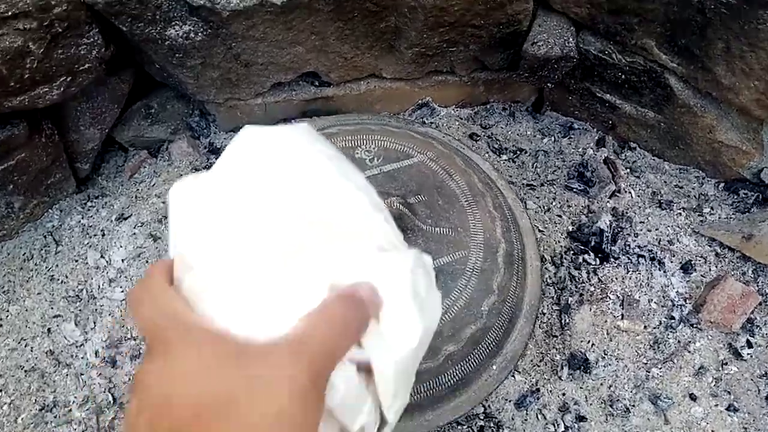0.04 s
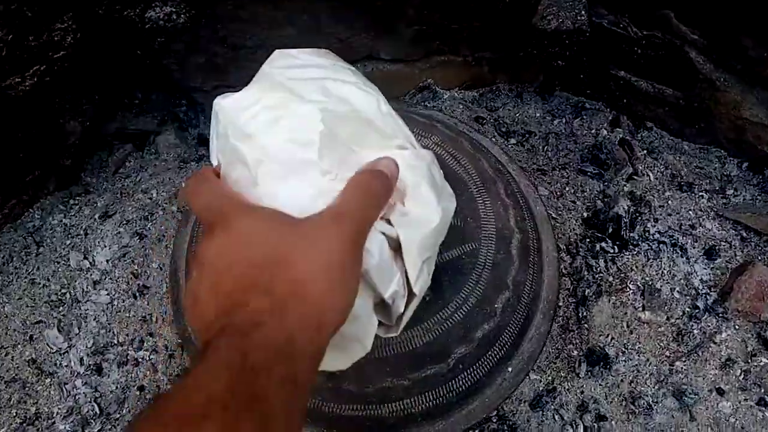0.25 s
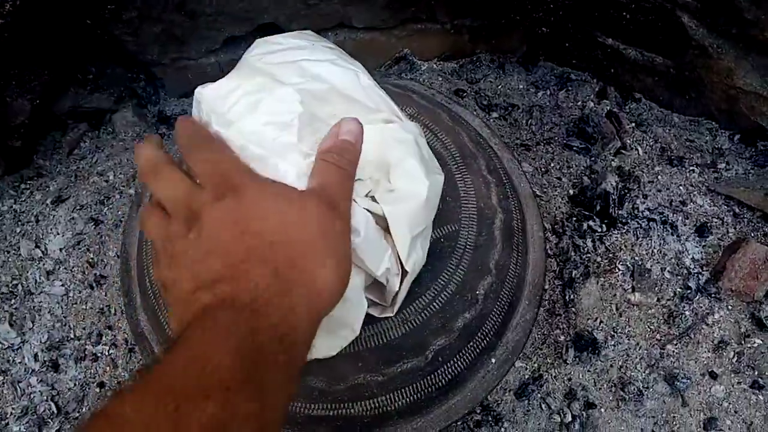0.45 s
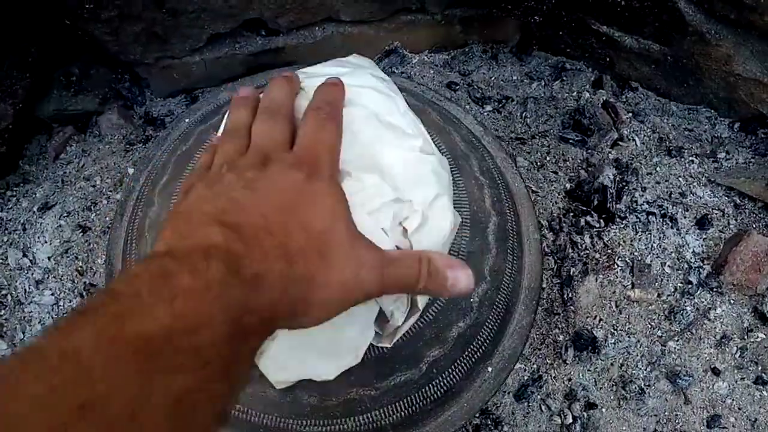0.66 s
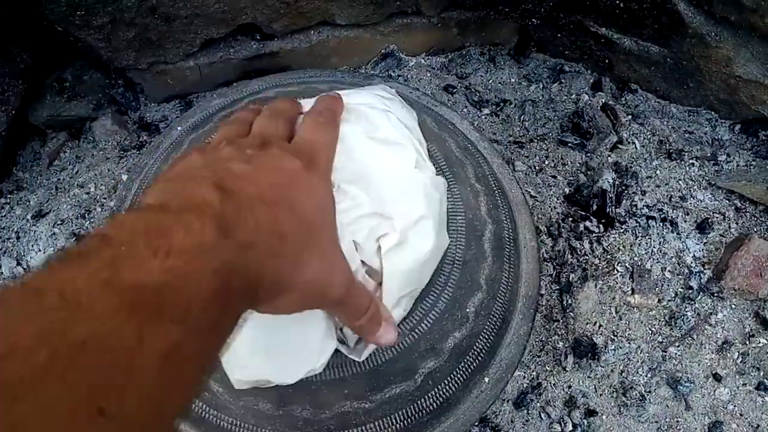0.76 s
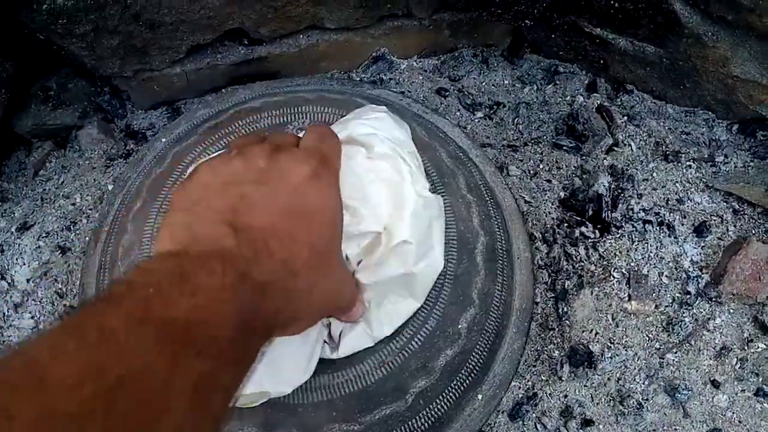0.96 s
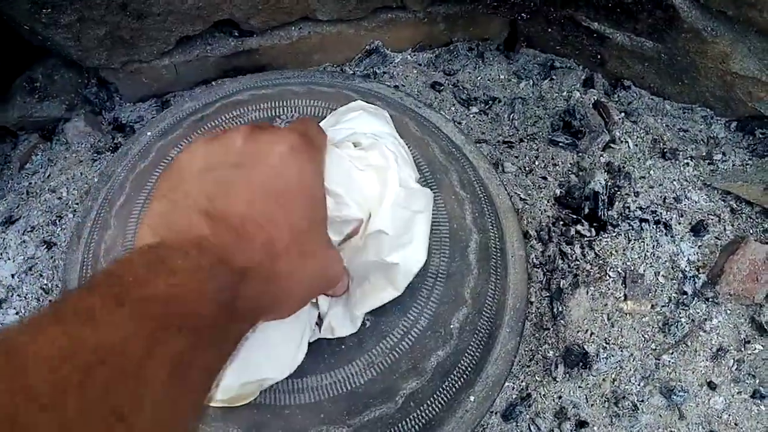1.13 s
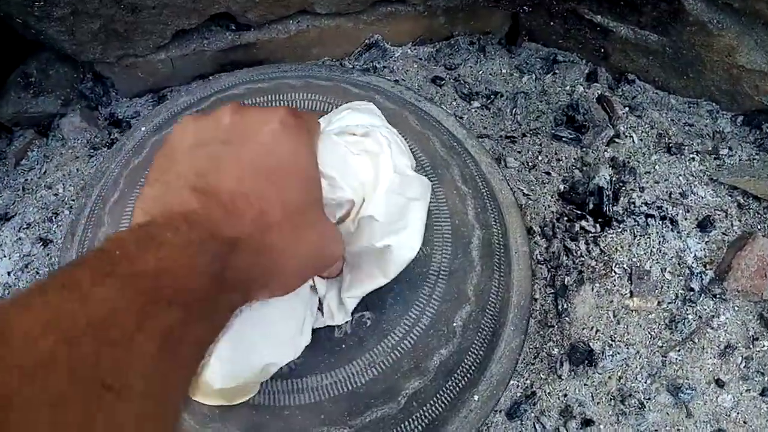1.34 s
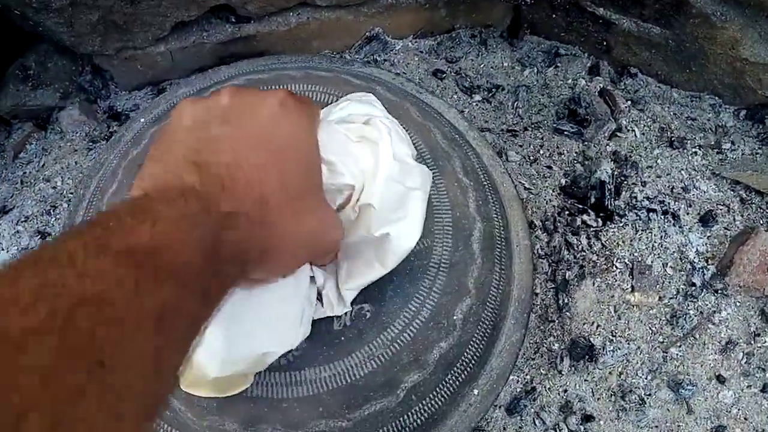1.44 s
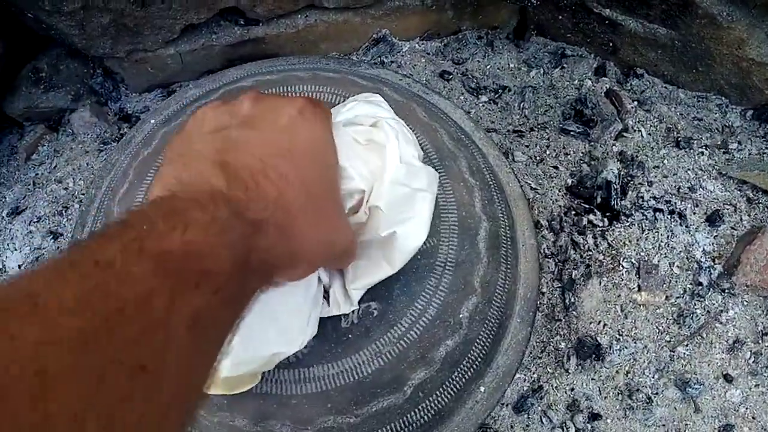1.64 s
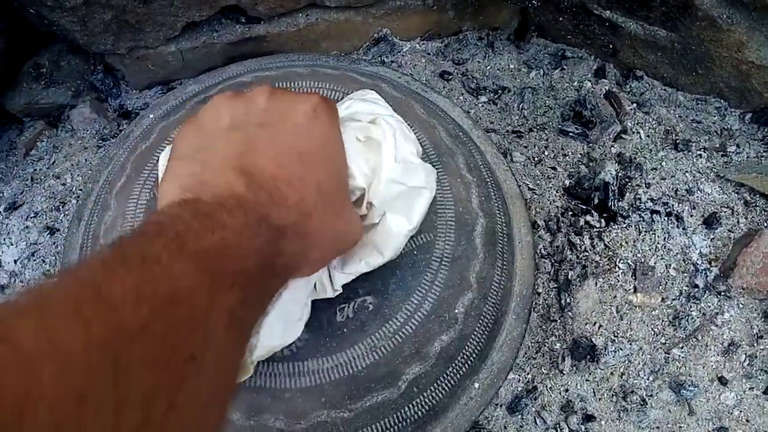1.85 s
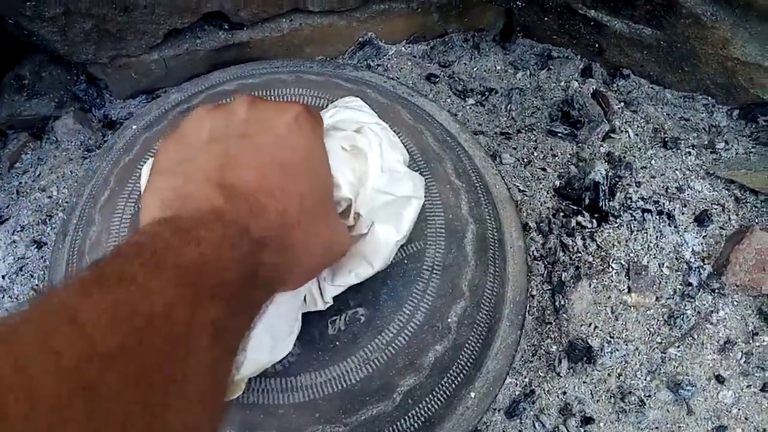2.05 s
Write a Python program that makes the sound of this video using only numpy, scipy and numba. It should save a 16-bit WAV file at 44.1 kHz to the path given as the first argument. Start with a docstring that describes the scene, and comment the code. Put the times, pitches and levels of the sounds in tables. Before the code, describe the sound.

A wad of paper is scrunched in still outdoor air, building from a few ticks to dense crackling with hollow pops, then fading. Beneath it a metal lid grinds softly on ash. The dry sound sits far left.

```python
"""In still outdoor air a few creases tick, and a hand slides a wad of paper onto a metal lid lying in ash.
The damped lid scrapes low on the grit under dull bumps of the hand, its ring shifting as it beds in.
The scrunch builds: countless tiny folds buckle and rub, with sharp creases and hollow pops among them.
Late on, two faint squeaks come as the grip tightens, and the crunch thins out to a last few snaps.
It all sounds dry and sits almost wholly on the left."""
import sys
import numpy as np
from scipy import signal
from scipy.fft import rfft, irfft
from scipy.io import wavfile
from scipy.ndimage import uniform_filter1d, map_coordinates
from numba import njit

SR = 44100
rng = np.random.default_rng(int(sys.argv[2]) if len(sys.argv) > 2 else 0)


def dump(signal):
    """Clip the signal to [-1, 1] and save it as 16-bit WAV at the path in sys.argv[1]."""
    limited = np.clip(np.atleast_2d(signal).T, -1, 1)
    pcm = np.round(limited * 32767).astype(np.int16)
    wavfile.write(sys.argv[1], SR, pcm)


N = 92610

# tone of the still outdoor air: f/Hz, level/dB
AIR_EQ = [(30, -47), (200, -6), (420, 1), (800, 5.5), (1400, 0.5), (6500, -6.5), (10000, -16), (15500, -30)]
# how hard the hand crushes the paper: t/s, level/dB
CRUSH_ENVELOPE = [(0, -65.5), (.15, -61), (.185, -58), (.205, -55), (.24, -48), (.26, -58), (.288, -43.5),
                  (.315, -54), (.36, -50), (.40, -49), (.425, -54), (.465, -53.5), (.505, -44), (.56, -43),
                  (.59, -55.5), (.61, -44.5), (.64, -46), (.70, -42.5), (.76, -39.5), (.82, -41),
                  (.87, -40.5), (.92, -40.5), (1.05, -41), (1.2, -41), (1.3, -43.5), (1.37, -49.5),
                  (1.435, -44), (1.485, -52.5), (1.53, -54), (1.59, -46.5), (1.655, -39.5), (1.71, -42),
                  (1.755, -43), (1.79, -48.5), (1.85, -60), (1.9, -68), (1.98, -71.5), (1.995, -56.5),
                  (2.015, -56), (2.06, -63.5), (2.1, -64)]
# tone of the paper: f/Hz, level/dB
PAPER_EQ = [(100, -28.5), (350, -13.5), (600, -1), (800, -1.5), (980, 1), (1220, -0.5), (1550, 1.5),
            (1880, 1.5), (2150, -2.5), (2400, 1.5), (2650, -1.5), (2900, 1.5), (3200, 0), (4050, 1),
            (5400, 0), (6650, 1.5), (7700, -6), (8800, -5), (10500, -16.5), (12800, -28.5), (15200, -24.5)]
# creases that snap: t/s, level/dB, f/Hz
CREASE_CUES = [(.0175, -46.5, 2571), (.0255, -44, 6580), (.0775, -42.5, 910), (.1743, -42.5, 1850),
               (0.2401, -41, 3270), (.2775, -52, 1680), (.3224, -41, 1730), (.3624, -38.5, 2960),
               (.3934, -38, 6800), (.5283, -35, 3330), (.566, -36, 5230), (.5858, -31.5, 3340),
               (.6591, -33.5, 6410), (.6838, -27.5, 5500), (.6976, -32, 4230), (.7677, -29, 3500),
               (.7804, -32, 4570), (.802, -32.5, 1704), (.806, -32.5, 1750), (.8412, -32.5, 5800),
               (.8675, -27.5, 2780), (.877, -32.5, 1790), (.973, -31.5, 6863), (1.054, -32, 3800),
               (1.244, -32, 4100), (1.302, -34, 1983), (1.3545, -34, 4733), (1.3941, -34.5, 5084),
               (1.4165, -31.5, 3400), (1.4421, -35, 3650), (1.5104, -37, 5570), (1.7002, -32.5, 5170),
               (1.742, -31, 5523), (1.7499, -29, 5040), (1.7518, -45, 2370), (1.8194, -40, 4950),
               (1.843, -38.5, 5900), (1.8618, -41.5, 4530), (1.882, -42, 3060), (1.9085, -40.5, 4670),
               (1.923, -50, 3120), (1.9347, -54, 6500), (1.9484, -40, 6270), (1.9878, -41.5, 2330),
               (1.9966, -42, 4940), (2.0297, -43, 2900), (2.0345, -43, 6460), (2.0457, -43, 4570),
               (2.0579, -41, 5700), (2.0768, -42, 4300), (2.0906, -41, 6200)]
# modes of the lid, damped by the ash: f/Hz, level/dB, t60/s
LID_MODES = [(490, -8, 0.024), (625.6, -1.5, 0.05), (807, -6.5, 0.049), (972, -10.5, 0.067)]
# the lid's pitch as it beds into the ash: t/s, pitch/ratio
LID_BEND = [(.2, 1.01), (.3, 0.99), (.41, 1.09), (.51, 0.99), (.64, 1.03), (.75, 0.97), (.89, 1.02),
            (1.06, 1.065), (1.3, 1.06), (1.7, 1.04)]
# the lid scraping on grit: t/s, level/dB
SCRAPE_ENVELOPE = [(0, -76), (.16, -75), (.24, -54.5), (.3, -56), (.46, -58.5), (.51, -48.5), (.59, -53),
                   (.7, -47.5), (.8, -50), (.89, -47.5), (.95, -54.5), (1.05, -47), (1.15, -59.5),
                   (1.38, -62), (1.43, -64), (1.52, -67), (1.68, -52), (1.77, -60.5), (1.87, -74),
                   (2.1, -97)]
# weight of the hand bumping the wad: t/s, level/dB
BUMP_ENVELOPE = [(0, -77), (.2, -79), (.28, -62.5), (.44, -68.5), (.51, -61), (.65, -65.5), (.77, -55),
                 (.87, -61.5), (.94, -69), (1.15, -68), (1.38, -81), (1.43, -59), (1.51, -101), (1.7, -69),
                 (1.87, -77.5), (2.1, -94)]
# dull tone of those bumps: f/Hz, level/dB
BUMP_EQ = [(50, -36), (110, -6), (190, -1), (350, 1), (600, 1), (1500, -29), (8000, -69)]
# hollow pops of broad folds: t/s, level/dB, f/Hz
POP_CUES = [(.479, -35, 920), (0.488, -32.5, 1030), (0.514, -37, 600), (.752, -34.5, 665), (.843, -40, 615),
            (.869, -39.5, 400), (.893, -35.5, 600), (1.343, -43, 940), (1.425, -45, 620),
            (1.772, -35.5, 885), (1.794, -45, 1010), (1.8457, -39.5, 1040)]
# rubbing squeaks, one contour each: t/s, f/Hz, level/dB
SQUEAK_CONTOURS = [
    [(1.493, 1267, -51), (1.505, 1168, -58), (1.528, 1012, -55.5), (1.55, 1085, -63), (1.58, 1210, -54)],
    [(1.85, 861, -56), (1.872, 859, -62), (1.894, 856, -55), (1.925, 864, -73), (2.0, 850, -70)],
]
# tone of the microphones' own noise: f/Hz, level/dB
HISS_EQ = [(25, -6), (65, 10), (130, 15.5), (400, 6.5), (1500, -1.5), (6500, -2), (9000, -14.5),
           (15000, -9)]

FULL_DB = -40.5  # reference level of a firm crush
FOLD_LOW_HZ, FOLD_HIGH_HZ = 390, 9450
TIGHTEN_HZ_PER_S = 1230  # the broadest folds get smaller as the wad is packed
FLUTTER_DB, FLUTTER_PER_S = 1.14, 62


def undb(db):
    """Decibels to gain."""
    return 10 ** (np.asarray(db) / 20)


def unit(x):
    """Scale to rms 1."""
    return x / np.sqrt(np.mean(x ** 2))


def curve(rows):
    """Join (t/s, value) breakpoints with straight lines."""
    return np.interp(np.arange(N) / SR, *np.array(rows).T)


def eq(x, points):
    """Minimum-phase EQ through (f/Hz, level/dB) points, with unit power gain."""
    hz, db = np.array(points).T
    size = 4096
    bin_hz = np.arange(size // 2 + 1) * SR / size
    gain = unit(undb(np.interp(np.log(bin_hz + 1), np.log(hz), db)))
    cepstrum = irfft(np.log(gain))
    cepstrum[1:size // 2] *= 2
    cepstrum[size // 2 + 1:] = 0
    return signal.fftconvolve(x, irfft(np.exp(rfft(cepstrum))))[:N]


def noise(points):
    """Noise shaped by an EQ curve, at rms 1."""
    return unit(eq(rng.standard_normal(N), points))


def drift(per_s):
    """Smooth random modulation at rms 1."""
    hold = int(SR / per_s)
    return unit(uniform_filter1d(rng.standard_normal(N)[np.arange(N) // hold], hold))


@njit
def rings(starts, hz, t60, size):
    """A decaying sine for each start time."""
    out = np.zeros(N)
    for k in range(len(starts)):
        phasor = size[k] + 0j
        step = np.exp((2j * np.pi * hz[k] - np.log(1000) / t60[k]) / SR)
        first = int(starts[k] * SR)
        for i in range(max(first, 0), min(N, first + int(t60[k] * SR))):
            phasor *= step
            out[i] += phasor.imag
    return out


def ticks(per_s, spread_db):
    """Random impulses of uneven size and sign, at rms 1."""
    fires = rng.random(N) < per_s / SR
    sign = rng.choice([-1, 1], N)
    size = undb(spread_db * np.minimum(rng.exponential(size=N), 3.5))
    return unit(fires * sign * size / np.sqrt(per_s))


def air(db=-71):
    """A faint, steady bed of outdoor air."""
    return undb(db) * noise(AIR_EQ)


def rustle(full_per_s=10000, db_per_decade=28.5, ring_cycles=3.34, fold_db=-.5, rub_db=-4):
    """Tiny folds buckle, faster the harder the paper is crushed, over the hiss of sheets rubbing."""
    effort_db = curve(CRUSH_ENVELOPE)
    buckles = ticks(full_per_s * 10 ** ((effort_db - FULL_DB) / db_per_decade), spread_db=2.5)
    at = np.flatnonzero(buckles)
    lowest_hz = FOLD_LOW_HZ + TIGHTEN_HZ_PER_S * at / SR
    hz = lowest_hz + (FOLD_HIGH_HZ - lowest_hz) * rng.random(N)[at]
    folds = rings(at / SR, hz, ring_cycles / hz, buckles[at] * np.sqrt(hz))
    texture = undb(fold_db) * unit(eq(folds, PAPER_EQ)) + undb(rub_db) * noise(PAPER_EQ)
    return texture * undb(effort_db + FLUTTER_DB * drift(FLUTTER_PER_S))


def creases(crack_db=1, crack_s=.0012, crumble_db=-6, crumble_s=.0031, facet_db=-2.5, ring_cycles=14.4):
    """Each crease cracks, rings its own facet and sets off a crumble of smaller folds."""
    out, t = np.zeros(N), np.arange(SR // 40) / SR
    burst = np.hypot(undb(crack_db) * np.exp(-t / crack_s), undb(crumble_db) * np.exp(-t / crumble_s))
    for start, db, hz in CREASE_CUES:
        lowest_hz = FOLD_LOW_HZ + TIGHTEN_HZ_PER_S * start
        low_cut = signal.butter(1, lowest_hz / 2, "high", fs=SR, output="sos")
        crack = signal.sosfilt(low_cut, burst * rng.choice([-1, 1], len(t)))
        decay = np.exp(-np.log(1000) * t * hz / ring_cycles)
        facet = undb(facet_db) * np.sqrt(hz / 1000) * np.sin(2 * np.pi * hz * t) * decay
        attack_s = .00045 * undb(FULL_DB - db)  # quieter snaps have a softer onset
        attack = 1 - np.exp(-t / attack_s)
        i = int(start * SR)
        out[i:i + len(t)] += (undb(db) * attack * (crack + facet))[:N - i]
    return eq(out, PAPER_EQ)


def slide(peak_s=.191, swell_s=.0025, fade_s=.032, band_hz=(6050, 6650), db=-49):
    """A thin, bright hiss swells as the wad first slides on the metal."""
    t = np.arange(N) / SR - peak_s
    band = signal.butter(2, band_hz, "band", fs=SR, output="sos")
    hiss = unit(signal.sosfilt(band, rng.standard_normal(N)))
    return undb(db) * hiss * np.exp(np.minimum(t / swell_s, -t / fade_s))


def lid_scrape(wobble=.03):
    """Grit catches and slips under the lid and drives its damped modes, which shift as it beds in."""
    hz, db, t60 = np.array(LID_MODES).T.copy()
    polarity = (-1) ** np.arange(len(hz))
    body = rings(np.zeros(len(hz)), hz, t60, undb(db) * polarity)
    ringing = signal.fftconvolve(ticks(per_s=1400, spread_db=3), body)[:N]
    speed = curve(LID_BEND) * (1 + wobble * drift(FLUTTER_PER_S))
    bent = map_coordinates(ringing, [np.cumsum(speed)], mode="mirror")  # varispeed bends the pitch
    catching = undb(2 * FLUTTER_DB * drift(FLUTTER_PER_S))
    return unit(catching * bent) * undb(curve(SCRAPE_ENVELOPE))


def hand_bumps():
    """The hand's weight knocks dully on the wad."""
    bumps = unit(eq(ticks(per_s=450, spread_db=2.5), BUMP_EQ))
    return bumps * undb(curve(BUMP_ENVELOPE))


def pops(ring_cycles=16, low_cut_hz=450):
    """Broad folds flip over with a hollow note; paper radiates little bass."""
    starts, db, hz = np.array(POP_CUES).T.copy()
    low_cut = signal.butter(2, low_cut_hz, "high", fs=SR, output="sos")
    return signal.sosfilt(low_cut, rings(starts, hz, ring_cycles / hz, undb(db)))


def squeaks(jitter=.0196, rasp=.53, rasp_per_s=340, fade_s=.003):
    """Brief stick-slip tones, raspy because each slip differs in length and strength."""
    t, out = np.arange(N) / SR, np.zeros(N)
    for contour in SQUEAK_CONTOURS:
        times, hz, db = np.array(contour).T
        pitch_hz = np.interp(t, times, hz) * (1 + jitter * drift(rasp_per_s))
        phase = 2 * np.pi * np.cumsum(pitch_hz) / SR
        tone = unit((1 + rasp * drift(rasp_per_s)) * np.sin(phase))
        gate = np.clip(np.minimum(t - times[0], times[-1] - t) / fade_s, 0, 1)
        out += gate * undb(np.interp(t, times, db)) * tone
    return out


def scene(left_db=5, right_db=-44):
    """Paper and lid over the air bed, panned hard left; a trace reaches the right 1 ms later."""
    mix = rustle() + creases() + slide() + lid_scrape() + hand_bumps() + pops() + squeaks() + air()
    delayed = np.pad(mix, (SR // 1000, 0))[:N]
    return np.array([undb(left_db) * mix, undb(right_db) * delayed])


def record(dry, hiss_db=-78.5, top_hz=15600):
    """The microphones add faint hiss, and a steep high cut takes off the top."""
    hiss = undb(hiss_db) * np.array([noise(HISS_EQ) for _ in dry])
    high_cut = signal.ellip(10, .2, 80, top_hz, fs=SR, output="sos")
    return signal.sosfilt(high_cut, dry + hiss)


dry = scene()
out = record(dry)
dump(out)
```